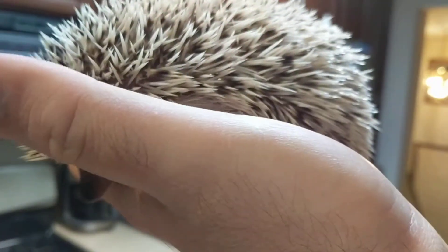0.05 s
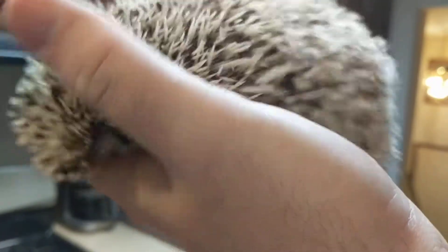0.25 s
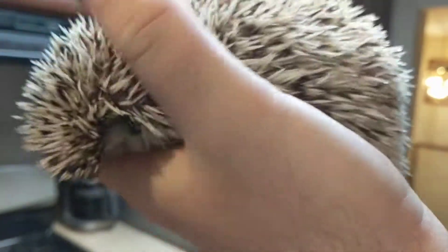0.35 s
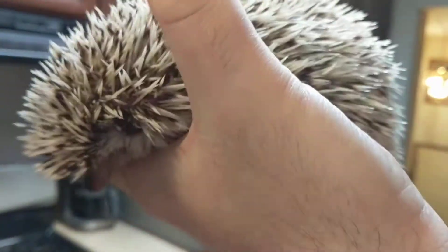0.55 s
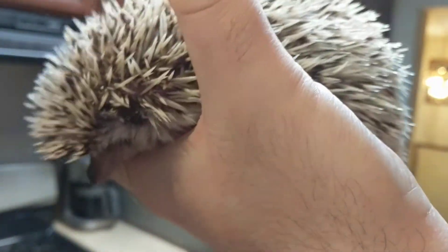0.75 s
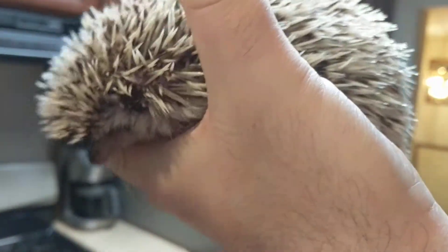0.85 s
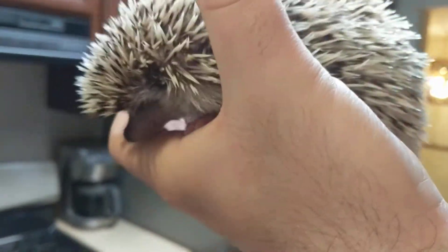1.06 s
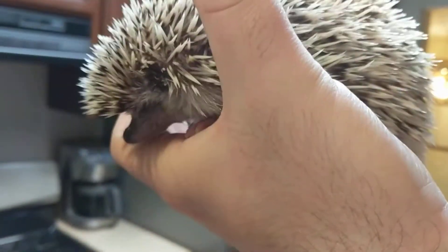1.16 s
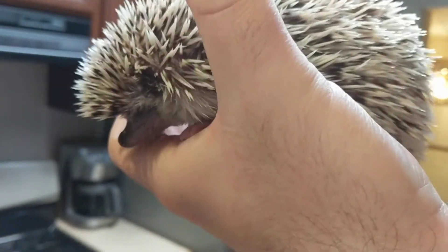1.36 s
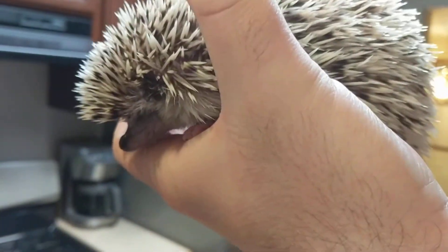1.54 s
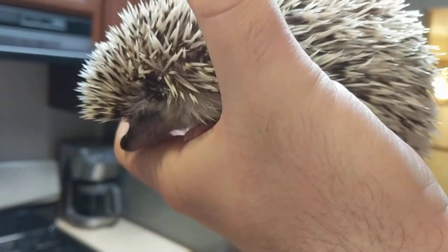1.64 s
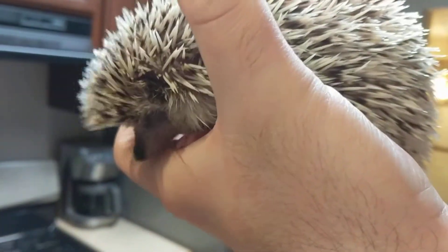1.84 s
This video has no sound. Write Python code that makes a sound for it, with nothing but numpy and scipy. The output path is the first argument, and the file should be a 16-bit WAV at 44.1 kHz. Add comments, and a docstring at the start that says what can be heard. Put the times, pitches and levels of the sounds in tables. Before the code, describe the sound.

A hedgehog huffs close to the microphone. Its first hissing puff breaks into a short grunt, the next flutters softly, and fainter puffs follow. Three tiny sniffs come last, over a quiet kitchen's low hum.

```python
"""A quiet kitchen, with a hedgehog held in a hand close to the microphone.
Over a mains hum and the dull wash of the room, its quills rub and rustle against the hand.
Then it huffs, each huff air hissing through its narrow snout: the first breaks into a short grunt,
the next flutters softly, and fainter ones follow. Three tiny sniffs come last as it settles."""
import sys
import numpy as np
from scipy import signal
from scipy.fft import rfft, irfft
from scipy.io import wavfile

SR = 44100
rng = np.random.default_rng(int(sys.argv[2]) if len(sys.argv) > 2 else 0)


def unload_audio(sound):
    """Save the sound as a 16-bit wav file, at the path given as the first command line argument."""
    columns = np.transpose(np.atleast_2d(sound))
    # keep every value between -1 and 1, then stretch to whole-number steps
    steps = np.round(np.clip(columns, -1, 1) * 32767)
    wavfile.write(sys.argv[1], SR, steps.astype(np.int16))


N = 83790
T = np.arange(N) / SR

# room tone of the kitchen: frequency_hz, gain_db
WASH_SPECTRUM = [(45, -6.5), (80, -3), (130, -6.5), (200, -7), (260, -5.5), (400, -7), (700, -14.5),
                 (1200, -16.5), (1800, -22), (3000, -27.5), (4100, -25), (7000, -32), (15500, -37.5)]
# tones of the mains hum: pitch_hz, level_db
HUM_TONES = [(59.2, -64), (238, -71), (689, -77.5)]
# faint rustle of the quills: time_s, level_db
RUSTLE_LEVELS = [(0, -84), (.1, -77), (.2, -79), (1.15, -80), (1.351, -70.5), (1.45, -77), (1.62, -72.5),
                 (1.9, -80.5)]
# bright colour of the rustle: frequency_hz, gain_db
RUSTLE_SPECTRUM = [(1000, -31), (3300, -4.5), (4100, 4), (5200, -8), (7200, -9), (8400, -4.5), (10000, -5),
                   (15000, -19.5)]
# soft rubs of the quills on the hand: peak_s, half_width_s, level_db
QUILL_RUBS = [(0.011, 0.0074, -61.5), (1.61, 0.018, -74)]
# dull colour of a rub: frequency_hz, gain_db
RUB_SPECTRUM = [(100, -24), (600, -7), (1500, -5.5), (2500, -19), (12000, -37)]
# pushes of air, one a row: start_s, peak_s, end_s, start_db, peak_db, end_db, then, relative to the
# snout hiss: throat_db, mouth_db, drone_db, nasal_hz, nasal_db, whistle_hz, whistle_width_hz,
# whistle_db, spit_db
HUFFS = [(0.2, 0.29, 0.42, -46.5, -44.5, -52, -11, -4, -37, 2245, -8.5, 11500, 2210, 1, -38),
         (0.422, 0.46, .654, -59.5, -56.5, -52.5, 0.5, -11, -23, 2165, -5.5, 12340, 1490, -9, -5),
         (.750, .778, 0.8, -71.5, -57, -70, -1.5, -1, -7, 2140, 1.5, 13500, 1100, -8.5, -17),
         (0.841, .885, .993, -64, -56, -61.5, -4, 0, -3, 2100, -5.5, 11380, 2400, -12, -27),
         (1, 1.105, 1.129, -60, -54, -53.5, 0, -8.5, -7, 2160, -5, 12270, 990, -5.5, -13),
         (1.198, 1.203, 1.29, -62, -65.5, -81, -12, -2, -11, 2200, -1, 13000, 1300, -10, -25),
         (1.232, 1.254, 1.259, -71, -60.5, -68, 6, -4.5, -11, 2160, 3.5, 13100, 1200, -10, -9.5)]
# resonances of the snout: frequency_hz, gain_db
SNOUT_SPECTRUM = [(300, -34), (1650, -11), (2500, -10.5), (2900, -23.5), (3500, -13.5), (4050, -11),
                  (4300, -3), (4900, -2.5), (5500, -0.5), (6100, -1.5), (6700, -7), (7300, -16.5),
                  (9000, -24.5), (12000, -17), (15500, -22)]
# resonances of the throat below it: frequency_hz, gain_db
THROAT_SPECTRUM = [(100, -11), (200, -17), (270, -0.5), (450, 1), (700, -1), (900, -4), (1150, -4),
                   (1400, -16.5), (1700, -32), (3000, -39)]
# throat pulses of the grunt in the first huff: time_s, pitch_hz, level_db
GRUNT_CURVE = [(0.22, 312, -64), (0.237, 324.9, -48.5), (0.249, 342.5, -42), (0.271, 377.6, -39.5),
               (.315, 352.9, -44), (.341, 344.5, -42), (.360, 302.8, -53.5), (0.391, 292.3, -48),
               (.412, 265, -56.5), (0.426, 243, -61)]
# colour of the grunt: frequency_hz, gain_db
GRUNT_SPECTRUM = [(150, -3.5), (240, 0.5), (360, 0.5), (500, -3), (710, 0), (900, -6.5), (1140, -8.5),
                  (1400, -6.5), (1750, -31), (2400, -40), (3200, -39), (6000, -53)]
# flutter of the airway in the second huff: time_s, pitch_hz, level_db
FLUTTER_CURVE = [(.428, 245, -65), (.470, 237.9, -55.5), (.515, 243.1, -59.5), (.575, 318.4, -56.5),
                 (.610, 300, -58), (.645, 281, -49.5), (.660, 290, -64)]
# colour of the flutter: frequency_hz, gain_db
FLUTTER_SPECTRUM = [(150, -3.5), (300, -1.5), (480, -12.5), (720, -7), (1100, -13), (1500, -24),
                    (3000, -45)]
# unevenness of the flutter: time_s, share_of_pitch
FLUTTER_JITTER = [(.43, .02), (.55, .03), (.63, .1)]
# tiny sniffs: peak_s, level_db
SNIFFS = [(1.375, -67), (1.501, -71), (1.775, -67.5)]

NASAL_WIDTH_HZ, MOUTH_HZ, MOUTH_WIDTH_HZ = 430, 1120, 426
ATTACK_S, RELEASE_S = 0.0078, 0.0028
SPIT_HALF_WIDTH_S, SPIT_LEAD_S = 0.0052, 0.0095  # the last jerk of air before a huff is cut off
WHISTLE_FADE_DB_PER_S, WHISTLE_BUILD_S = 43, 0.011
TURBULENCE_DB, TURBULENCE_GROWTH, HARD_PUSH_DB = -55, 3.1, -45.5  # a hard push adds a wide top hiss


def amp(db):
    """Decibels to gain."""
    return 10 ** (np.asarray(db) / 20)


def unit(x):
    """Scales to rms 1."""
    return x / np.sqrt(np.mean(x ** 2) + 1e-20)


def noise():
    """White noise."""
    return rng.standard_normal(N)


def colour(x, spectrum):
    """Filters x causally by a spectrum drawn on a log-frequency axis; rms 1."""
    hz, db = np.transpose(spectrum)
    f = abs(np.fft.fftfreq(4096, 1 / SR))
    log_gain = np.log(amp(np.interp(np.log(f + 1), np.log(hz), db)))
    taps = np.fft.ifft(np.exp(np.conj(signal.hilbert(log_gain)))).real  # minimum phase
    return unit(signal.oaconvolve(x, taps[:len(taps) // 2])[:N])


def wander(rate_hz):
    """Random drift up to a rate; rms 1."""
    f = np.fft.rfftfreq(N, 1 / SR)
    return unit(irfft(rfft(noise()) / (1 + (f / rate_hz) ** 4), N))


def ring(hz, width_hz):
    """Air noise in one resonance; rms 1."""
    detune = (np.fft.rfftfreq(N, 1 / SR) - hz) / width_hz
    return unit(irfft(rfft(noise()) / np.hypot(1, 2 * detune) / (1 + detune ** 2 / 2), N))


def swell(peak_s, half_width_s, level_db):
    """A bell-shaped rise and fall in level."""
    return amp(level_db) * np.exp(-((T - peak_s) / half_width_s) ** 2)


def kitchen(waver=0.3, wash_db=-62, low_cut_hz=40):
    """Behind the animal, a slightly wavering mains hum and the steady wash of the room."""
    hum = np.zeros(N)
    for hz, db in HUM_TONES:
        level = amp(db) * np.sqrt(2) * (1 + waver * wander(10))
        hum += level * np.sin(2 * np.pi * (hz * T + rng.random()) + waver * wander(4.4))
    low_cut = signal.butter(4, low_cut_hz, "high", fs=SR, output="sos")
    return hum + amp(wash_db) * signal.sosfilt(low_cut, colour(noise(), WASH_SPECTRUM))


def quills(grain_db=3):
    """Quills shift against the hand: dull rubs and a fine, grainy rustle."""
    rub_level = sum(swell(*rub) for rub in QUILL_RUBS)
    rustle_level = amp(np.interp(T, *np.transpose(RUSTLE_LEVELS)))
    grains = noise() * amp(grain_db * wander(360))
    return rub_level * colour(noise(), RUB_SPECTRUM) + rustle_level * colour(grains, RUSTLE_SPECTRUM)


def room_reflections(direct, level_db=-14.5, t60_s=0.24):
    """The kitchen's short diffuse tail, weak with the microphone so close."""
    t = T[:SR // 2]
    tail = rng.standard_normal(len(t)) * amp(-60 * t / t60_s) * (t > .003)
    return amp(level_db) * signal.oaconvolve(direct, tail / np.linalg.norm(tail))[:N]


def huffs(pulsing, unsteady_db=0.5, unsteady_hz=70):
    """Each push of air sounds throat, mouth, snout and a high nostril whistle, then is cut off."""
    snout = colour(noise(), SNOUT_SPECTRUM)
    throat = colour(noise() * pulsing, THROAT_SPECTRUM)
    mouth = ring(MOUTH_HZ, MOUTH_WIDTH_HZ) * pulsing
    drone = ring(hz=248.2, width_hz=18)
    hiss, push = np.zeros(N), np.zeros(N)
    for (start_s, peak_s, end_s, start_db, peak_db, end_db, throat_db, mouth_db, drone_db,
         nasal_hz, nasal_db, whistle_hz, whistle_width_hz, whistle_db, spit_db) in HUFFS:
        age_s = np.maximum(T - start_s, 0)
        gate = np.minimum(age_s / ATTACK_S, 1) * np.exp(-np.maximum(T - end_s, 0) / RELEASE_S)
        contour = amp(np.interp(T, [start_s, peak_s, end_s], [start_db, peak_db, end_db]) - peak_db)
        spit = swell(end_s - SPIT_LEAD_S, SPIT_HALF_WIDTH_S, spit_db)
        flow = gate * (contour + spit)
        body = snout + amp(throat_db) * throat + amp(mouth_db) * mouth + amp(drone_db) * drone
        body += amp(nasal_db) * ring(nasal_hz, NASAL_WIDTH_HZ)
        whistle = amp(whistle_db - WHISTLE_FADE_DB_PER_S * age_s) * ring(whistle_hz, whistle_width_hz)
        whistle *= 1 - np.exp(-age_s / WHISTLE_BUILD_S)
        hiss += amp(peak_db) * (flow * body + flow ** 2 * whistle)
        push += amp(peak_db - HARD_PUSH_DB) * flow
    turbulence = amp(TURBULENCE_DB) * push ** TURBULENCE_GROWTH * ring(hz=8850, width_hz=6600)
    return (hiss + turbulence) * amp(unsteady_db * wander(unsteady_hz))


def throat_pulses(curve, spectrum, jitter, shimmer=0.2, uneven_hz=170):
    """Uneven pulses along a pitch and level curve; returns level, phase and a voice of rms 1."""
    time_s, pitch_hz, level_db = np.transpose(curve)
    level = np.interp(T, time_s, amp(level_db), left=0, right=0)
    jittered_hz = np.interp(T, time_s, pitch_hz) * (1 + jitter * wander(uneven_hz))
    phase = 2 * np.pi * np.cumsum(jittered_hz) / SR
    pulses = -sum(np.cos(k * phase) for k in range(1, 14))
    pulses *= 1 + shimmer * wander(uneven_hz)
    return level, phase, colour(pulses, spectrum)


def grunt(rasp_db=-10.5, pulsing_depth=0.5):
    """Each throat pulse tears a rasp of air; returns the grunt and the pulsing it gives the airflow."""
    level, phase, voice = throat_pulses(GRUNT_CURVE, GRUNT_SPECTRUM, jitter=0.025)
    rasp = amp(rasp_db) * ring(hz=1060, width_hz=760) * (1 + np.sin(phase))
    pulsing = 1 + pulsing_depth * np.sqrt(level / level.max()) * np.cos(phase)
    return level * (voice + rasp), pulsing


def flutter(rasp_db=-9):
    """The airway flutters in a faint low purr that turns ragged as the second huff ends."""
    jitter = np.interp(T, *np.transpose(FLUTTER_JITTER))
    level, phase, voice = throat_pulses(FLUTTER_CURVE, FLUTTER_SPECTRUM, jitter)
    rasp = amp(rasp_db) * ring(hz=800, width_hz=700) * (1 + np.sin(phase))
    return level * (voice + rasp)


def sniffs(throat_db=-4, snout_db=-8, nasal_hz=2350, nasal_db=-4, mouth_db=-2, half_width_s=0.012):
    """Tiny puffs through the same airway as the animal settles."""
    air = amp(throat_db) * colour(noise(), THROAT_SPECTRUM)
    air += amp(snout_db) * colour(noise(), SNOUT_SPECTRUM)
    air += amp(nasal_db) * ring(nasal_hz, NASAL_WIDTH_HZ)
    air += amp(mouth_db) * ring(MOUTH_HZ, MOUTH_WIDTH_HZ)
    return air * sum(swell(peak_s, half_width_s, level_db) for peak_s, level_db in SNIFFS)


def scene():
    """The hedgehog close to one microphone, the kitchen behind it."""
    grunt_sound, pulsing = grunt()
    hedgehog = grunt_sound + flutter() + huffs(pulsing) + sniffs() + quills()
    return (hedgehog + room_reflections(hedgehog) + kitchen())[None]


def record(dry):
    """The recorder cuts off the highest treble."""
    cutoff_hz = 15770
    low_pass = signal.firwin(1023, cutoff_hz, window=("kaiser", 9), fs=SR)
    return signal.oaconvolve(dry, low_pass[None], "same")


dry = scene()
out = record(dry)
unload_audio(out)
```